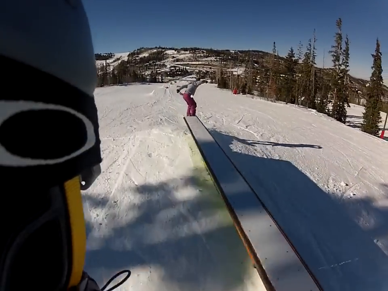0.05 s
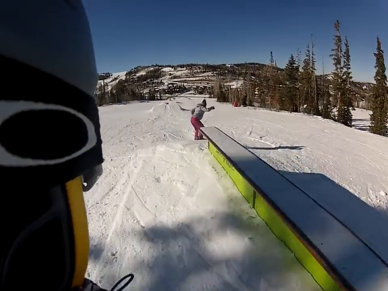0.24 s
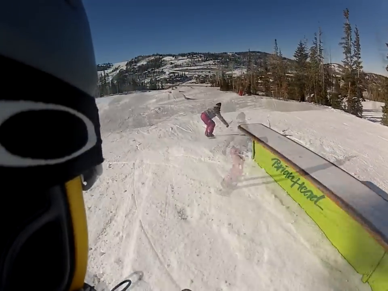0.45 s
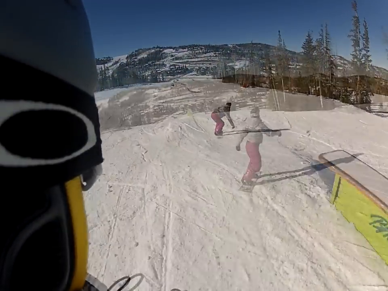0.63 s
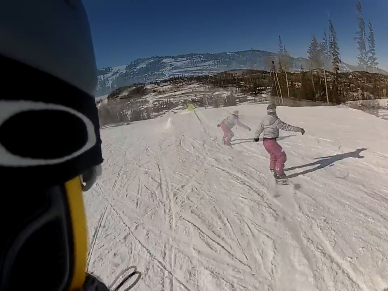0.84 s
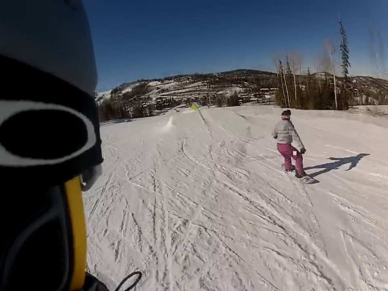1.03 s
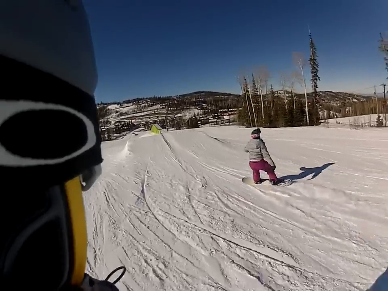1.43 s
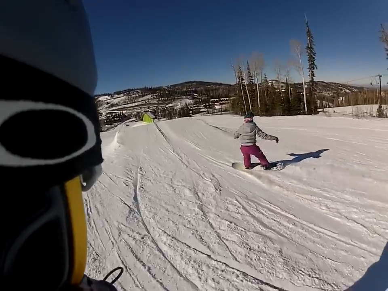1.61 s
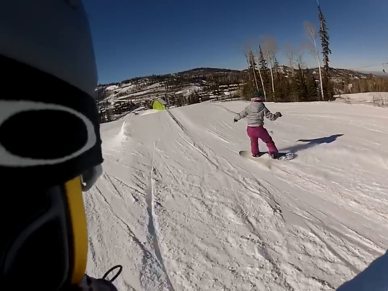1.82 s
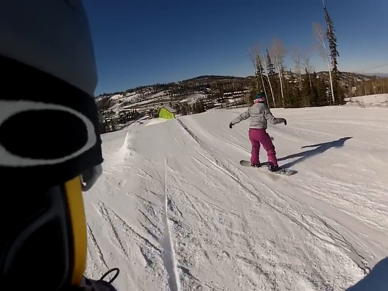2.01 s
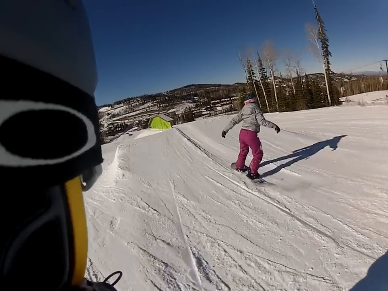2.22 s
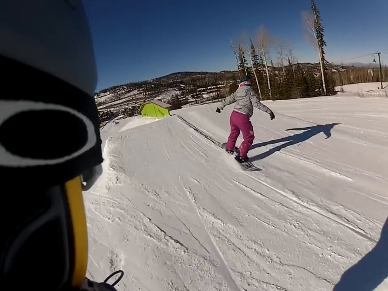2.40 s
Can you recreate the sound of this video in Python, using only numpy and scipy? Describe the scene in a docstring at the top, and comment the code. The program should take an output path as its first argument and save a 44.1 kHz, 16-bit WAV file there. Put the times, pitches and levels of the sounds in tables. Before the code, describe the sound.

A snowboard thumps down on packed snow and glides on with a rumbling hiss.

```python
"""On a slope of packed snow, a snowboarder with a helmet camera lands off a low ramp and glides on.
The landing and the ride shake the camera on its springy mount, making a deep thump and a rumble.
The board hisses as it crushes snow; its edge snaps the crust and throws up sprays.
The camera's plastic case rubs and ticks, and a soft wind blows round the helmet."""
import sys
import numpy as np
from scipy import signal
from scipy.fft import rfft, irfft
from scipy.io import wavfile

SR = 44100
rng = np.random.default_rng(int(sys.argv[2]) if len(sys.argv) > 2 else 0)


def master_out(mix):
    """Clip the mix to full scale and print it as 16-bit PCM to the path in sys.argv[1]."""
    frames = np.transpose(np.atleast_2d(mix))
    ceiling = np.clip(frames, -1, 1)
    pcm = np.round(ceiling * 32767).astype(np.int16)
    wavfile.write(sys.argv[1], SR, pcm)


N = 112454
T = np.arange(N) / SR
FREQS = np.fft.rfftfreq(N, 1 / SR)


def amp(db):
    """Turns decibels into a number to multiply by."""
    return 10 ** (np.asarray(db) / 20)


def unit(x):
    """Scales a signal so that its average strength (rms) is 1."""
    return x / np.sqrt(np.mean(x ** 2) + 1e-20)


def level(points, **ends):
    """Joins (time [s], level [dB]) points into a volume curve."""
    return amp(np.interp(T, *np.transpose(points), **ends))


def colour(x, points):
    """Shapes bass and treble by (frequency [Hz], level [dB]) points, then scales to strength 1."""
    hz, db = np.transpose(points)
    gain = amp(np.interp(np.log(FREQS + 1), np.log(hz), db))
    return unit(irfft(rfft(x) * gain, N))


def drift(hz):
    """A random wobble of strength 1, with little in it faster than hz."""
    return unit(irfft(rfft(rng.standard_normal(N)) * np.exp(-(FREQS / hz) ** 2), N))


def grains(per_s, spread_db):
    """Clicks of uneven size at random moments."""
    size = amp(spread_db * np.minimum(rng.exponential(1, N), 4))
    return unit(size * rng.choice([-1, 1], N) * (rng.random(N) < per_s / SR))


def mount_shake():
    """The camera sways on its mount; the landing jolts it and it rings until friction stops it."""
    # how hard the ride shakes the mount: (time [s], level [dB])
    shaking = [(0, -55), (.18, -46), (.38, -46), (.43, -42), (.47, -37), (.58, -39.5), (.63, -32),
               (.68, -33.5), (.74, -29), (.81, -31), (.88, -30.5), (.95, -40), (1.01, -35.5), (1.13, -42),
               (1.18, -36.5), (1.26, -39), (1.3, -54), (1.4, -47.5), (1.49, -47), (1.54, -38),
               (1.62, -34.5), (1.74, -44), (1.93, -42), (2.04, -44.5), (2.18, -42.5), (2.27, -51),
               (2.41, -43), (2.55, -48)]
    # tone of the uneven jostling: (frequency [Hz], relative level [dB])
    jostle_tone = [(10, -13), (25, -2), (50, 0.5), (70, -7), (110, -22), (300, -60), (1000, -100)]
    sway_hz, ring_hz = 37.2, 39
    turns = np.cumsum(sway_hz * (1 + .14 * drift(hz=14.1))) / SR
    jostle = colour(rng.standard_normal(N), jostle_tone)
    sway = unit(unit(np.sin(2 * np.pi * turns)) + .37 * jostle) * level(shaking)
    jolt_s, jolt_width_s = .2548, .0049
    u = (T - jolt_s) / jolt_width_s
    jolt = amp(-8) * (1 - u ** 2) * np.exp(-u ** 2 / 2)
    peak_s, rise_s, fade_s, stop_s = .2598, .021, .31, .395
    t = T - peak_s
    swell = np.exp(-(np.minimum(t, 0) / rise_s) ** 2)
    fade = amp(-60 * np.maximum(t, 0) / fade_s)
    brake = np.clip((stop_s - T) * ring_hz, 0, 1)  # friction ends the ring within one swing
    ring = amp(-10) * swell * fade * brake * np.cos(2 * np.pi * ring_hz * t)
    return sway + jolt + ring


def mount_clack():
    """The mount's stiff parts chatter at the hardest point of the landing."""
    # pitches at which they ring: (frequency [Hz], width [Hz], relative level [dB])
    rings = [(3010, 250, 1), (4470, 110, 0.5), (7550, 200, -5), (9200, 260, -16)]
    hit_s, width_s = .2555, .0033
    tone = sum(amp(db) / (1 + ((FREQS - hz) / width) ** 2) ** 2 for hz, width, db in rings)
    chatter = unit(irfft(rfft(rng.standard_normal(N)) * tone, N))
    return chatter * amp(-43) * np.exp(-((T - hit_s) / width_s) ** 2)


def board_glide():
    """The board crushes snow crystals: a grainy hiss that flutters over the ridges."""
    # loudness of the hiss: (time [s], level [dB])
    loudness = [(0, -65), (.1, -66.5), (.15, -56), (.3, -52.5), (.35, -51), (.55, -52), (.68, -50),
                (.93, -49.5), (1.07, -52.5), (1.18, -51.5), (1.28, -55.5), (1.62, -56.5), (1.7, -55),
                (1.9, -56), (2.1, -57), (2.2, -55.5), (2.4, -58), (2.55, -53.5)]
    # its tone inside the camera case: (frequency [Hz], relative level [dB])
    tone = [(100, 0), (300, 0.5), (520, -9), (680, -5), (880, -12.5), (1150, -0.5), (1450, -1),
            (1650, -3.5), (1870, 3.5), (2200, -7), (2800, -12.5), (3200, -10.5), (3520, -1.5), (4050, -18),
            (4700, -16), (5250, -11.5), (5700, -26), (6300, -25.5), (6800, -13.5), (7700, -24),
            (8550, -10.5), (9300, -25.5), (10200, -12), (11400, -31.5), (12600, -28.5), (13850, -17.5),
            (14600, -17), (15200, -33)]
    crush = rng.standard_normal(N) + amp(-9) * grains(per_s=820, spread_db=2.5)
    flutter = amp(1.42 * drift(hz=33))
    return colour(crush * flutter, tone) * level(loudness)


def board_slaps():
    """The board hits the snow and rings for a moment."""
    # hits on the snow: (time [s], level [dB])
    hits = [(.2085, -49), (.222, -46.5), (.2762, -37), (.308, -47.5), (1.684, -50)]
    # the board's own notes: (frequency [Hz], relative level [dB], time to fade by 60 dB [s])
    notes = [(171, -5.5, 0.063), (248, -2.5, 0.056), (339, -1.5, 0.061), (464, -7.5, .035),
             (664, -1, 0.044), (786, -7.5, 0.021)]
    slaps, t = np.zeros(N + SR), T[:SR // 6]
    for start, hit_db in hits:
        for hz, note_db, fade_s in notes:
            fade = amp(hit_db + note_db - 60 * t / fade_s)
            slaps[round(start * SR):][:len(t)] += fade * np.sin(2 * np.pi * hz * t)
    return slaps[:N]


def snow_sprays():
    """The board's edge throws short, bright gushes of snow, gritty with ice crumbs."""
    # gushes of snow: (start [s], length [s], level [dB])
    gushes = [(.198, 0.037, -60), (.236, 0.0545, -52), (0.253, 0.0073, -49), (2.226, 0.062, -55.5),
              (2.295, 0.073, -57.5), (2.365, 0.059, -55.5), (2.432, 0.073, -62.5)]
    # their tone: (frequency [Hz], relative level [dB])
    tone = [(200, -3.5), (700, 2), (1800, 2.5), (2400, -8), (3500, 5), (4000, -2.5), (4500, -2), (4800, -2),
            (5250, 2), (6000, -22), (6900, 0), (8000, -10), (8600, 1), (9500, -16), (11500, -29),
            (15000, -19)]
    volume, ramp_s = np.zeros(N), .0081
    for start, length, db in gushes:
        inside_s = np.minimum(T - start, start + length - T)
        volume += amp(db) * np.clip(inside_s / min(ramp_s, length / 2), 0, 1)
    crumbs = rng.standard_normal(N) + amp(-3) * grains(per_s=700, spread_db=3)
    clumps = amp(1.3 * drift(hz=110))
    return volume * colour(crumbs * clumps, tone)


def crust_snaps():
    """Hard snow breaks under the edge in sudden, short bursts of noise."""
    # breaks in the crust: (time [s], level [dB])
    breaks = [(0.141, -46), (0.1438, -54), (.2005, -68), (.2095, -54), (.2235, -42.5), (0.2447, -42.5),
              (0.272, -51), (0.2771, -54), (1.683, -47), (1.689, -58), (2.254, -48.5), (2.342, -52),
              (2.394, -53)]
    # their tone: (frequency [Hz], relative level [dB])
    tone = [(100, 15), (350, 9.5), (750, 0), (1500, -11), (3400, 5.5), (5000, -10.5), (6000, -10.5),
            (7000, -10), (8600, -9), (11500, -17), (15000, -15)]
    fade_s = .041
    bursts = sum(amp(db - 60 * np.maximum(T - s, 0) / fade_s) * (T >= s) for s, db in breaks)
    return bursts * colour(rng.standard_normal(N), tone)


def case_ring(knocked):
    """The plastic case rings briefly after one knock or one tiny slip; the peak is scaled to 1."""
    # its notes: (frequency [Hz], width [Hz], level when rubbed [dB], level when knocked [dB])
    notes = [(1194, 290, -3.5, 1.5), (1433, 260, -8.5, 0.5), (1818, 237, 2.5, 3), (2247, 240, -10.5, -35.5),
             (10096, 350, -10, -9), (10750, 220, -20, -13), (13250, 300, -31, -7), (13950, 420, -10.5, -16)]
    ring, t = 0, T[:SR // 20]
    for k, (hz, width, rub_db, knock_db) in enumerate(notes):
        age = np.pi * width * t  # a wider note dies sooner
        wave = np.sin(2 * np.pi * hz * t + k * np.pi)  # every other note starts upside down
        ring += amp(knock_db if knocked else rub_db) * age * np.exp(-age) * wave
    return ring / abs(ring).max()


def case_ticks():
    """Single knocks ring the case, each followed by a brief rattle."""
    # knocks on the case: (time [s], peak level [dB])
    knocks = [(.049, -44.5), (0.119, -44), (.2095, -39), (.2755, -25.5), (0.7091, -40), (1.3064, -40),
              (1.389, -45), (1.4585, -58), (1.683, -40.5), (1.687, -42), (1.7655, -38), (1.882, -39.5),
              (2.1247, -26.5), (2.132, -40.5), (2.1418, -37), (2.1553, -40), (2.165, -48)]
    rattle_delay_s, rattle_fade_s = .004, .05
    force, t = np.zeros(N + SR), T[:SR // 10]
    for start, db in knocks:
        knock = rng.standard_normal(len(t)) * amp(-31 - 60 * t / rattle_fade_s) * (t > rattle_delay_s)
        knock[0] = 1  # the hit itself, ahead of its rattle
        force[round(start * SR):][:len(t)] += amp(db) * knock
    return signal.fftconvolve(force, case_ring(knocked=True))[:N]


def case_rubs():
    """The plastic rubs in many tiny slips that keep the case ringing."""
    # three rubs, each a list of (time [s], level [dB])
    rubs = [
        [(.075, -63), (.095, -44.5), (.102, -65), (.112, -57), (.123, -52), (.15, -48.5), (.168, -42.5),
         (.2, -51.5), (.215, -49), (.226, -39), (.237, -46), (.27, -50), (.295, -81)],
        [(1.302, -60), (1.306, -52.5), (1.37, -47.5), (1.405, -45), (1.428, -48.5), (1.44, -45.5),
         (1.466, -44.5), (1.49, -49.5), (1.51, -54)],
        [(2.47, -71), (2.52, -60), (2.55, -56)],
    ]
    slips = grains(per_s=1500, spread_db=.5)
    ringing = unit(signal.fftconvolve(slips, case_ring(knocked=False))[:N])
    return ringing * sum(level(rub, left=-np.inf, right=-np.inf) for rub in rubs)


def wind():
    """Air flows round the helmet with a soft, lumpy rush."""
    # rise and fall of the wind: (time [s], level [dB])
    loudness = [(0, -61), (.1, -60), (.155, -53.5), (.2, -63), (.226, -43), (.25, -66), (.285, -48.5),
                (.33, -55), (.45, -61), (.8, -59), (1.3, -59), (1.45, -54.5), (1.6, -61), (1.7, -55),
                (1.9, -61), (2.55, -67)]
    # its tone: (frequency [Hz], relative level [dB])
    tone = [(30, 0.5), (80, 5), (120, 0.5), (190, -4.5), (300, -3.5), (420, -6), (600, -12), (1000, -17),
            (3000, -43)]
    lumps = amp(.5 + .73 * drift(hz=75))
    return colour(rng.standard_normal(N), tone) * level(loudness) * lumps


def whine(shake, hz=12005):
    """A thin, high whine follows the shaking."""
    return amp(-42) * shake * np.sin(2 * np.pi * hz * T)


def scene():
    """Adds all the sounds into one channel."""
    shake = mount_shake()
    mount = shake + mount_clack()
    snow = board_glide() + board_slaps() + snow_sprays() + crust_snaps()
    return (mount + snow + wind() + case_rubs() + case_ticks() + whine(shake))[None]


def record(dry):
    """Cuts away the highest treble."""
    cutoff_hz = 15450
    treble_cut = signal.firwin(511, cutoff_hz, window=("kaiser", 9), fs=SR)
    return signal.oaconvolve(dry, treble_cut[None], "same")


dry = scene()
out = record(dry)
master_out(out)
```